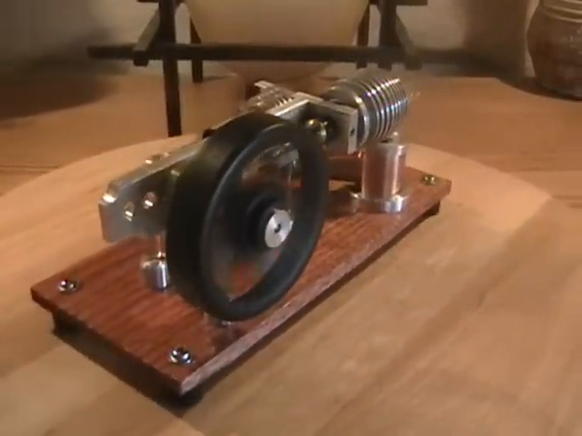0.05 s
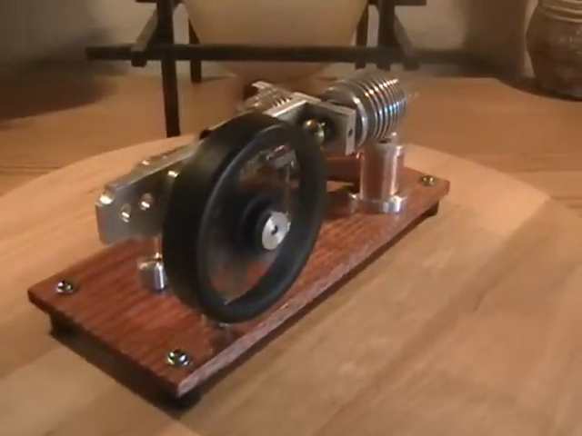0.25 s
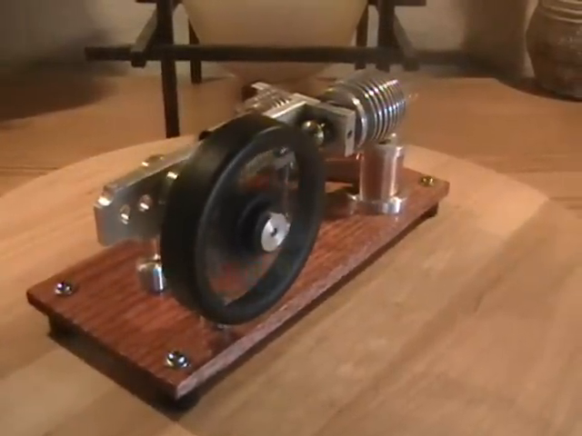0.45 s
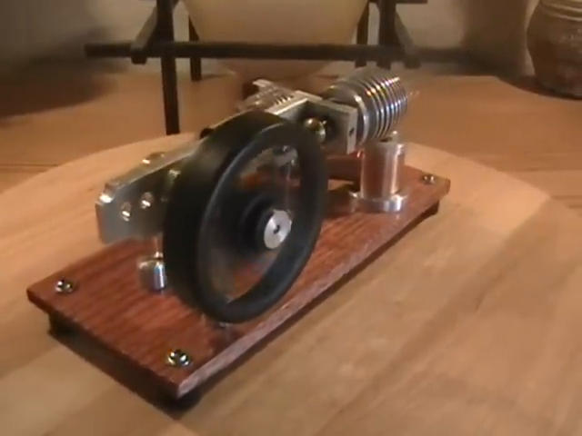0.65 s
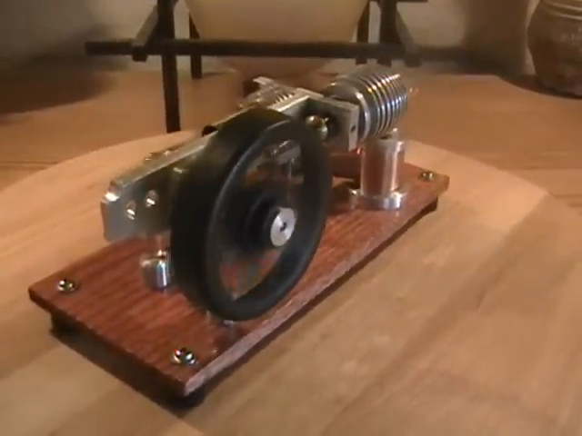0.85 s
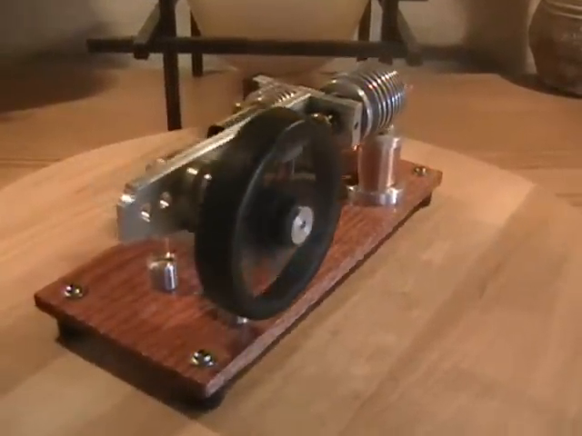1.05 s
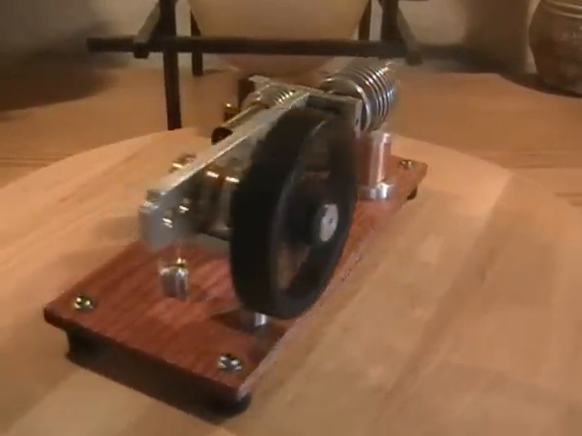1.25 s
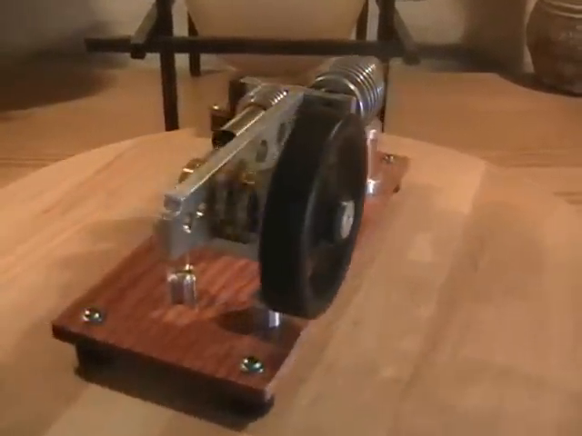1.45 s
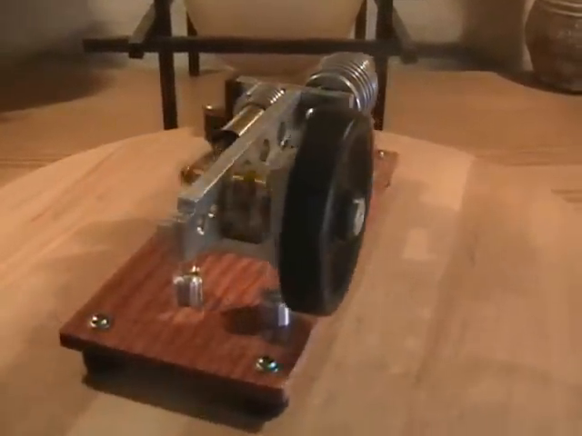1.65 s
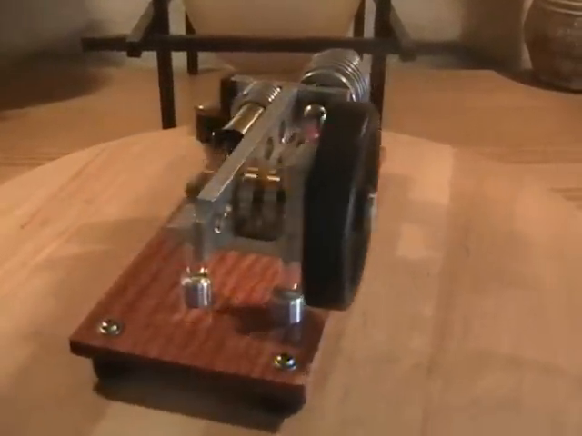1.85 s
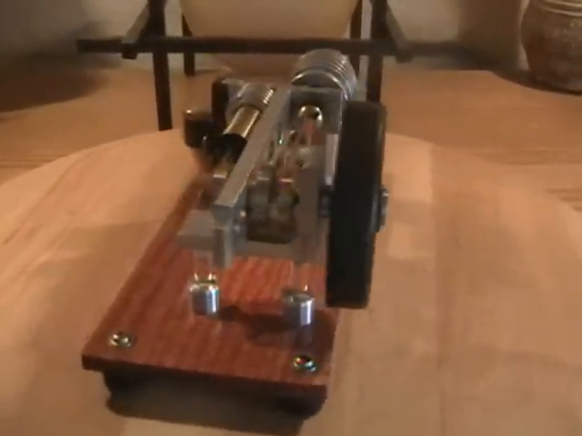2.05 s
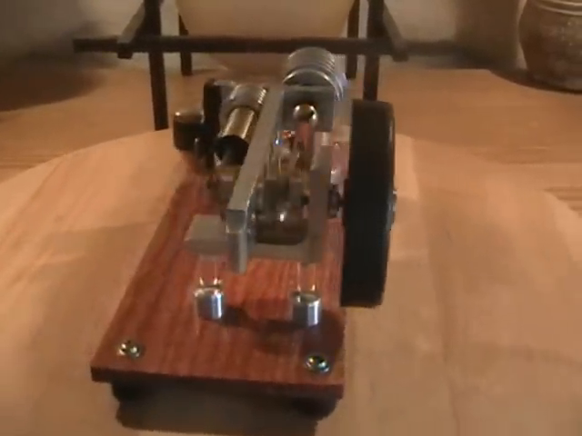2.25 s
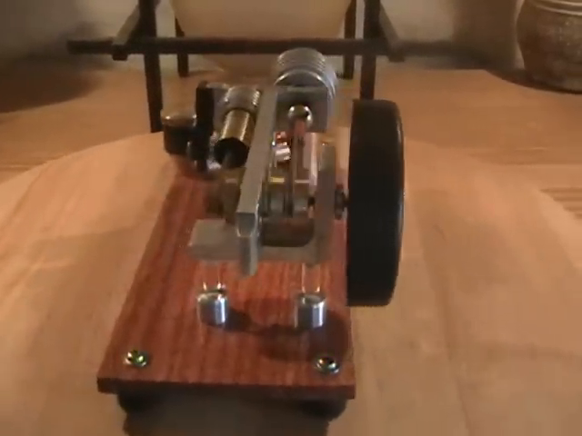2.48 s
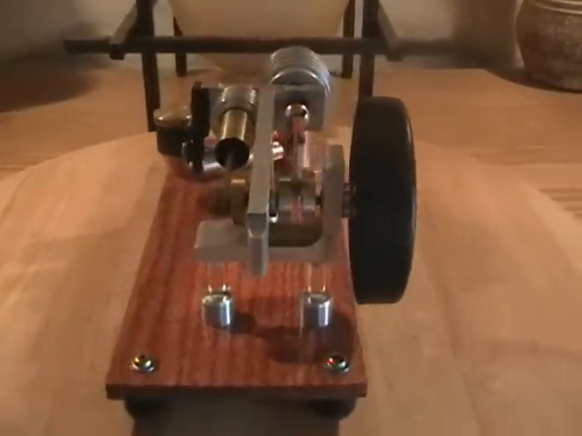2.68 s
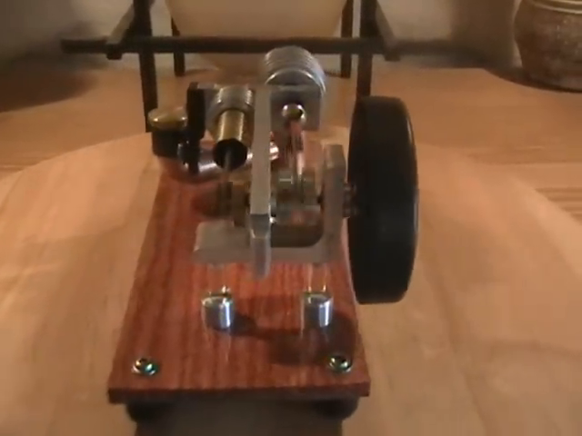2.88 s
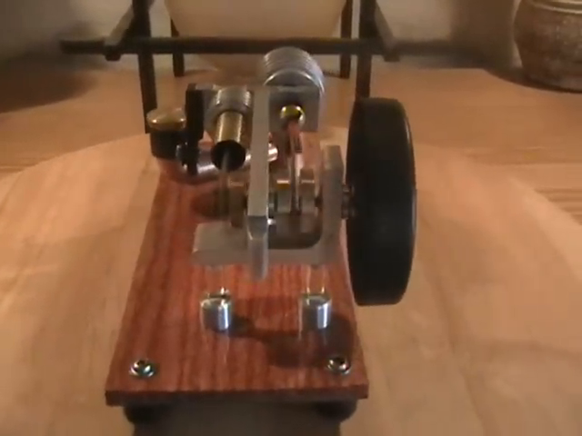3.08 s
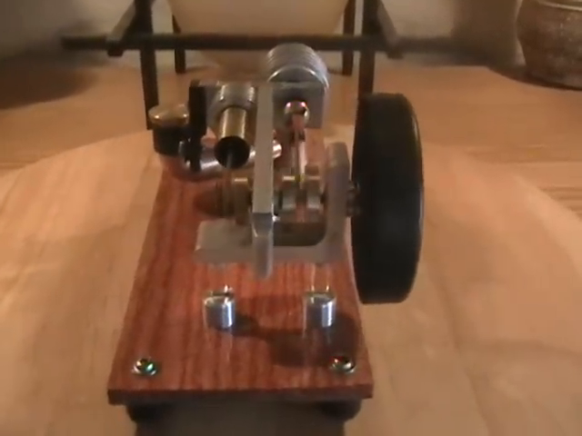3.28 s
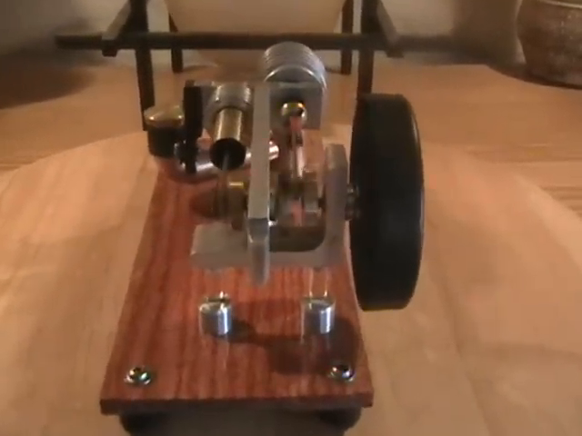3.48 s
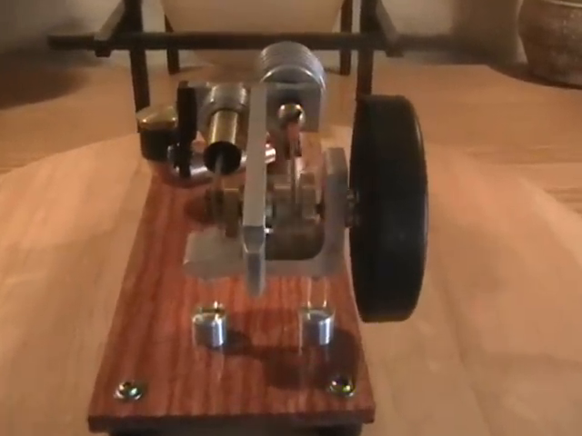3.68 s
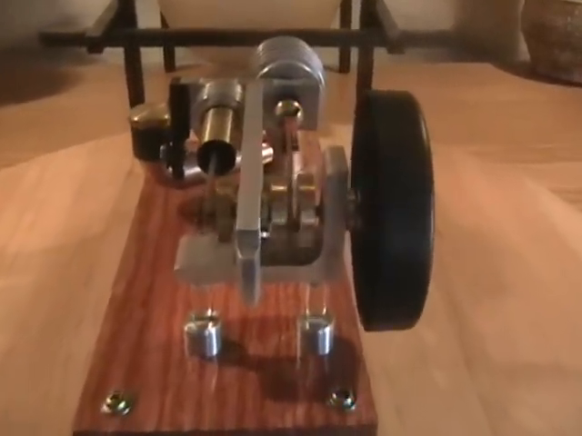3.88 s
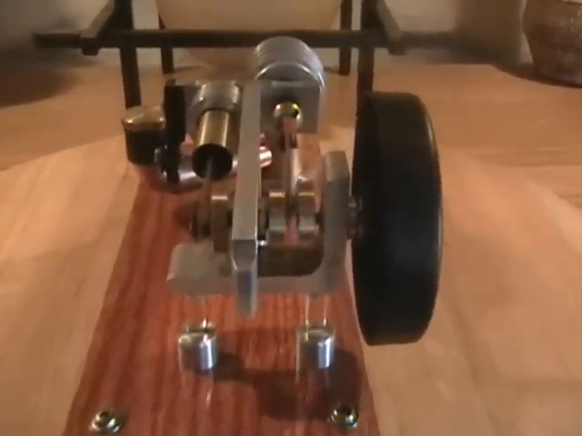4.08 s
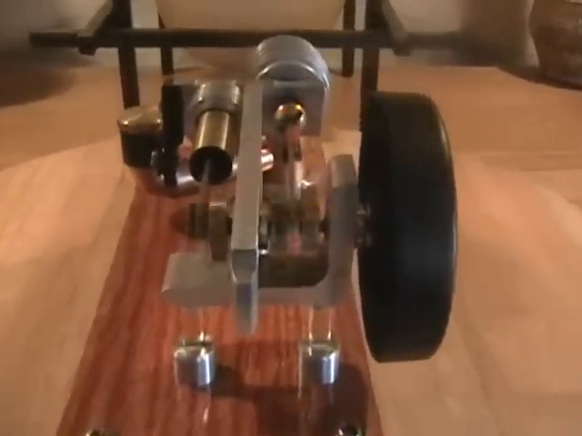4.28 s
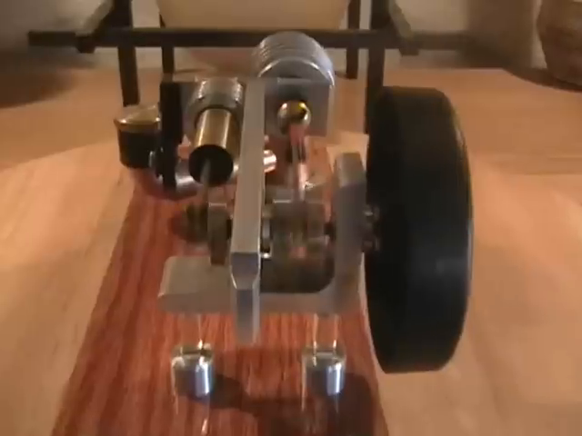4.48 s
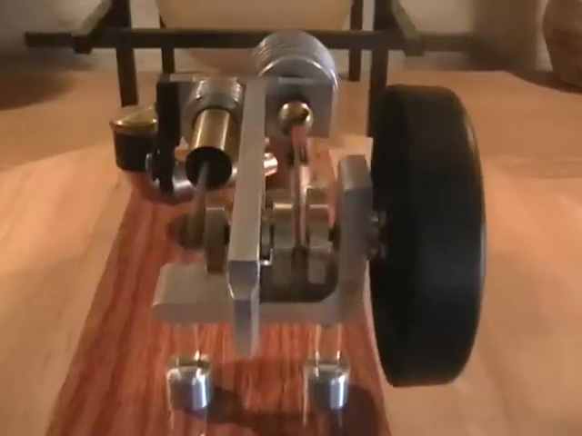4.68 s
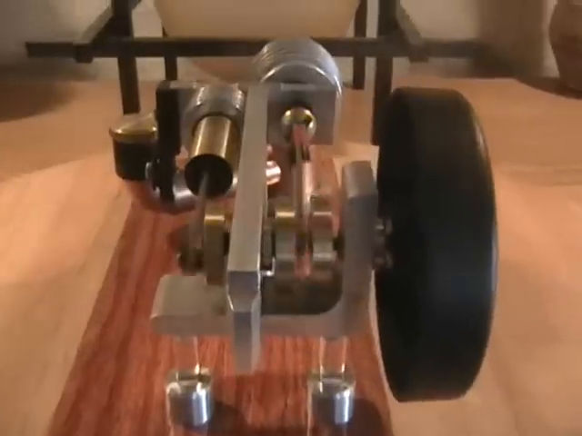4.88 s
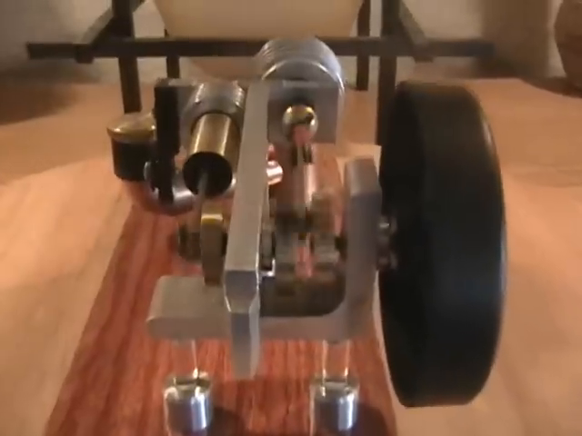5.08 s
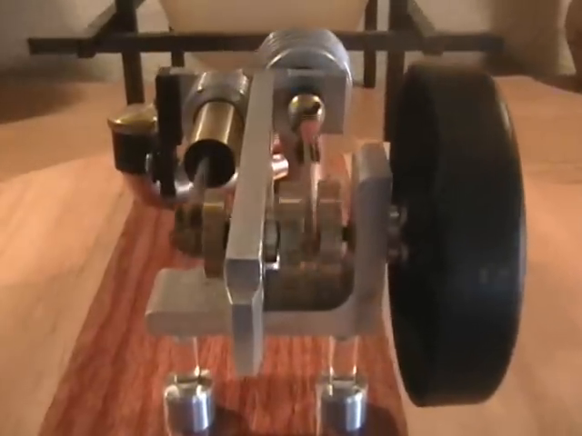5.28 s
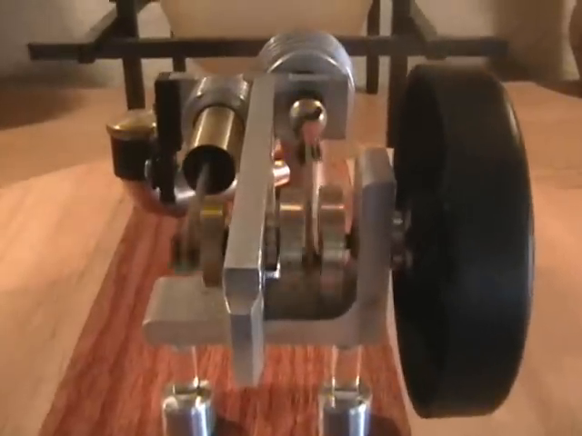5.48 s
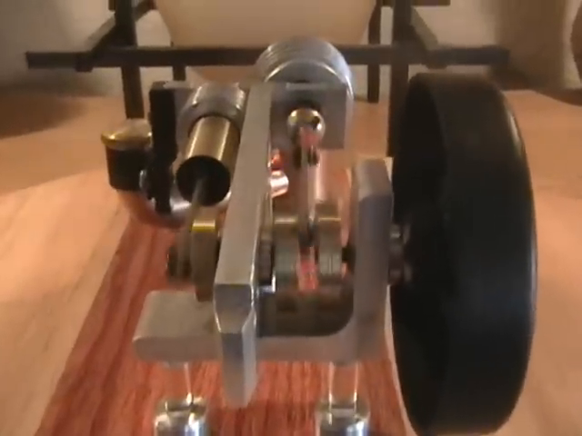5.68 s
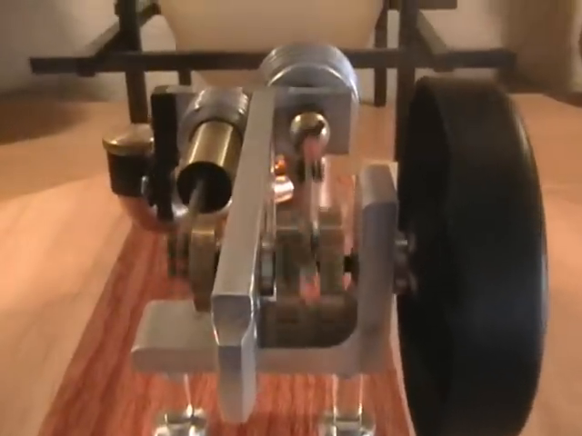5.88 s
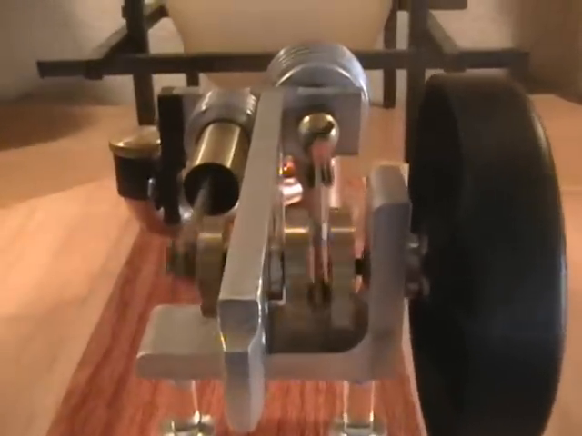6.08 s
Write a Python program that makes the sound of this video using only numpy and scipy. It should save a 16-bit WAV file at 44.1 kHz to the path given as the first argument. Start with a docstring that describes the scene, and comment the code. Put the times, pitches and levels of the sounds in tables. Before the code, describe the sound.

A little hot-air engine runs at steady speed on a wooden table, its loose linkage alternating metallic knocks and scratchier ticks, about six pairs a second. Light pin taps, piston rub and soft wooden drumming fill the gaps. After two seconds a dull bump comes and the knocks briefly falter. The microphone moves round to the front and closer, so the clatter grows louder; a dry snap and fainter bump come near the end. Quiet room, faint hum.

```python
"""A small hot-air engine on a wooden table turns a little over six times a second, first heard from the side.
Twice a turn linkage slack closes: a knock, then a scratchier tick, noise bursts that ring the frame's modes.
Pins tap softly, filtered noise makes piston rub and bearing purr, and low modes drum the base on the table.
After two seconds comes a dull bump and the knocks falter; the microphones move round, head-on and closer.
Near the end come a dry snap and another bump; soft room noise and a faint sine hum run throughout."""
import sys
import numpy as np
from scipy import signal
from scipy.fft import rfft, irfft, next_fast_len
from scipy.io import wavfile
from scipy.ndimage import map_coordinates

SR = 44100
rng = np.random.default_rng(int(sys.argv[2]) if len(sys.argv) > 2 else 0)


def unload_wav(signal):
    """Save mono or channel-first audio to the path in sys.argv[1] as 16-bit WAV at rate SR, clipped to [-1, 1]."""
    wavfile.write(
        sys.argv[1],
        SR,
        np.round(np.clip(np.atleast_2d(signal).T, -1, 1) * 32767).astype(np.int16),
    )


N = 270774

# Metal frame. Each row: mode in Hz, t60 in seconds, relative level in dB under a knock, the same under a tick,
# and change in dB from side-on to head-on.
FRAME_MODES = [(453, 0.13, -34, -40.5, 13.5), (836, 0.25, -23.5, -19, -17), (933, 0.24, -21.5, -26, 0),
               (983, 0.19, -20, -18, -1.5), (1098, 0.08, -13.5, -13, -3), (1317, 0.042, -13.5, -4, -2),
               (1445, 0.065, -20, -4, -7), (1625, 0.069, -7.5, -11, 6.5), (1720, 0.049, -11, -5.5, 11.5),
               (1815, 0.11, -7.5, -13, 0), (1954, 0.05, -6.5, -8, 13), (2051, 0.13, 7.5, 1.5, -10.5),
               (2154, 0.053, 5.5, -0.5, 1.5), (2267, 0.072, -3, 2.5, 2), (2318, 0.034, -6.5, -2, 8),
               (2542, 0.27, -19.5, -44, 2), (2553, 0.036, -5, -7, 5.5), (2737, 0.054, -27, -12.5, 9),
               (3231, 0.067, -11, -11.5, -1.5), (3336, 0.072, -23.5, -36, 9.5),
               (3560, 0.07, -12, -11.5, -9), (3783, 0.076, -15, -16.5, 3.5), (3972, 0.02, 5.5, -25, -3),
               (4114, 0.045, -4.5, -9, -4), (4614, 0.039, -4, 3, -22), (5060, 0.016, 4, 11.5, -51),
               (5300, 0.085, -20, -9, -23), (5683, 0.024, -9.5, -5, -4)]
# Crowded short-lived modes of rods and pins. Each row: frequency in Hz, relative density in dB per Hz.
KNOCK_COLOUR = [(60, -55), (200, -14), (450, -6), (750, -4.5), (1400, -4), (2100, 8), (2900, 2), (4000, 1),
                (5600, -6), (7200, -16.5), (8700, -12.5), (11500, -14.5), (14500, -24), (16500, -41)]
TICK_COLOUR = [(60, -55), (200, -32), (450, -8), (750, -5.5), (1400, -6), (2100, 6), (3200, -2), (4200, -2),
               (5500, 2), (7200, -10.5), (9000, -11.5), (12500, -8.5), (14500, -10.5), (16500, -51)]
# Force of the rod's knock, which falters and recovers. Each row: time in seconds, relative level in dB.
KNOCK_FORCE_CURVE = [(0, -1), (0.47, -1.5), (1.15, 0.5), (1.55, 0.8), (2.04, 1.8), (2.35, 2), (2.52, -5),
                     (2.68, -4.5), (2.97, 3.5), (3.29, -2), (3.46, 1.5), (3.61, 1), (3.779, -1), (4.15, -1),
                     (4.55, 1.5), (5.3, -1.5), (6.14, 2.5)]
# Force of the return stroke's rattle. Each row: time in seconds, relative level in dB.
TICK_FORCE_CURVE = [(0, -1.5), (0.6, -1.6), (1.2, -2.5), (2.1, 0), (3.2, -1), (3.5, 2.5), (3.7, 0.5),
                    (4.45, 3), (4.79, -3.5), (4.95, 1.5), (5.4, 0.5), (5.57, 4), (5.8, -3), (6.14, 6)]
# Treble of the contacts as the microphones move. Each row: time in seconds, relative level in dB.
TREBLE_CURVE = [(0, 0.3), (1.3, 1.2), (2.0, -0.2), (2.55, -1.25), (3.8, -0.7), (4.4, 1), (5.3, 3),
                (6.14, 2.5)]
# Flywheel. Each row: time in seconds, speed in turns a second.
FLYWHEEL_SPEED = [(0, 6.357), (1.9, 6.372), (2.55, 6.381), (3.3, 6.365), (6.14, 6.409)]
# Soft taps in every turn. Each row: delay in seconds after the crank's knock angle, relative level in dB,
# centre of the excited modes in Hz.
PIN_TAPS = [(.053, -7.5, 2100), (0.069, -10, 1810), (0.112, -9, 2080), (.126, -3.5, 1580),
            (.148, -9.5, 1600)]
# Piston friction. Each row: time in seconds, level in dB before trim and approach gain.
RUB_LEVEL = [(0, -53), (2.65, -49), (3.2, -51.5), (4, -52.5), (4.55, -51), (5.1, -53), (6.14, -50.5)]
# Spectrum of the piston friction. Each row: frequency in Hz, relative density in dB per Hz.
RUB_SPECTRUM = [(500, -10.5), (1000, 2.5), (1220, -37), (1500, 3.5), (1700, 14.5), (1820, -34), (2200, -14),
                (2450, 4), (3000, -10.5), (3900, -3.5), (6000, -38), (9000, -45), (15000, -49)]
# Wooden base on the table. Each row: mode in Hz, t60 in seconds, relative level in dB.
BASE_MODES = [(106.2, 0.34, -11), (114, 0.48, 1), (126, 0.16, -3), (229, 0.16, 0.5), (254, 0.62, -5.5),
              (374, 0.11, 2.5), (422, 0.043, 3.5)]
# Spectrum of the bearings. Each row: frequency in Hz, relative density in dB per Hz.
PURR_SPECTRUM = [(40, -32), (75, 0), (180, -12), (270, -6), (320, -17), (440, -0.5), (560, -13.5),
                 (900, -18), (2000, -46)]
# Dry snap. Each row: start in seconds, relative level in dB.
SNAP_TIMES = [(5.079, -27.5)]
# Dull bumps. Each row: start in seconds, relative level in dB.
BUMP_TIMES = [(2.344, -41), (5.647, -46)]
# Spectra of the snap and of a bump's two parts. Each row: frequency in Hz, relative density in dB per Hz.
SNAP_SPECTRUM = [(2000, -20), (5500, -6.5), (10000, 5), (15000, -4)]
THUMP_SPECTRUM = [(30, -14), (70, -1), (135, 14.5), (200, -9), (400, 5.5), (900, -46)]
CLACK_SPECTRUM = [(80, -14), (300, -1), (700, 9), (1350, 9), (2000, -10), (5000, -35)]
# Spectrum of the room noise. Each row: frequency in Hz, relative density in dB per Hz.
AIR_SPECTRUM = [(25, -50), (48, -34), (62, -14), (100, -1), (135, 2), (165, -9), (192, -10), (250, 2.5),
                (310, -5.5), (400, -4), (600, -7.5), (1200, -11), (4000, -22.5), (15000, -38)]
# Steady hum: an appliance tone near 240 Hz and two fainter steady tones. Each row: frequency in Hz, rms level
# in dB before the stereo balance.
HUM_TONES = [(239.5, -51.5), (291, -64.5), (178, -69)]
# Viewpoint of the microphones. Each row: time in seconds, position from 0 side-on to 1 head-on and close.
VIEWPOINT = [(0, 0.034), (3.4, 0.38), (4.5, 1), (6.14, 1)]
# Approach of the microphones. Each row: time in seconds, gain in dB.
APPROACH_GAIN = [(0, 1), (3.3, 1), (4.3, 1.5), (5.4, 6), (6.14, 4)]
# Echo of the room. Each row: frequency in Hz, t60 in seconds.
ROOM_DECAY = [(200, 0.1), (2000, 0.28), (5000, 0.21), (12000, 0.16)]
# Likeness of the two channels of noise. Each row: frequency in Hz, left-right correlation.
STEREO_LIKENESS = [(25, .65), (70, 0.96), (150, 0.91), (300, 0.75), (600, 0.57), (2000, 0.89),
                   (12000, 0.81)]
# Stereo balance. Each row: frequency in Hz, left minus right in dB.
STEREO_BALANCE = [(100, 3), (250, 2.5), (600, 1), (1400, -2.5), (2500, -2.1), (5000, -1.1), (12000, 0)]

TOP_HZ = 16400  # band limit of the microphones
LEAD = 512  # samples kept ahead of a contact
AGE = (np.arange(8192) - LEAD) / SR  # seconds since the contact
AFTER = np.maximum(AGE, 0)
TIME = np.arange(N) / SR
FIRST_KNOCK_S = 0.0019
TICK_ANGLE = 0.479  # turns from the knock to the return stroke's rattle
KNOCK_JITTER_S, TICK_JITTER_S = 0.0001, 0.0004  # the loose return stroke lands less exactly
FORCE_SCATTER_DB = 0.83  # from stroke to stroke
TREBLE_FOLLOWS = 0.19  # dB of treble for each dB of force: a harder contact mostly feeds the ring
BASE_NEAR = 0.51  # share of the approach gain, in dB, that reaches the drumming of the table


def linkage():
    """Slack closes twice a turn, in a knock and a tick; the knock has the harder crack."""
    _, _, knock_db, tick_db, _ = np.transpose(FRAME_MODES)
    knock_rows = blows(0, KNOCK_JITTER_S, KNOCK_FORCE_CURVE)
    tick_rows = blows(TICK_ANGLE, TICK_JITTER_S, TICK_FORCE_CURVE)
    knocks = contacts(knock_rows, knock_db, KNOCK_COLOUR, crack=1.4, clash_db=-10.5, clash_t60=0.05,
                      scrape=0.3, scrape_s=0.002, rise_s=0.0028, hold_s=0.019, chatter_db=1.0,
                      ring_db=-30, treble_db=-33.0)
    ticks = contacts(tick_rows, tick_db, TICK_COLOUR, crack=0.5, clash_db=-5.0, clash_t60=0.047,
                     scrape=0.74, scrape_s=0.0021, rise_s=0.0015, hold_s=0.022, chatter_db=2.5,
                     ring_db=-32.5, treble_db=-36.5)
    return knocks + ticks


def contacts(rows, mode_db, colour, crack, clash_db, clash_t60, scrape, scrape_s, rise_s, hold_s,
             chatter_db, ring_db, treble_db):
    """A joint slides through its slack, cracks home, chatters and sets frame and rods ringing."""
    track = np.zeros((2, N))
    slide = scrape * (AGE < 0) * np.exp(-(AGE / scrape_s) ** 2)
    impact = crack * fade(0.004)
    for s, low_db, high_db in rows:
        # the contact catches and lets go, about 700 times a second
        chatter = uneven((AGE - AGE[0]) * 700, chatter_db)
        envelope = impact + (slide + fade(clash_t60)) * chatter
        clash = clash_of(colour, s) * envelope
        frame = frame_ring(s, mode_db, scatter_db=2.5, rise_s=rise_s, hold_s=hold_s)
        x = frame + amp(clash_db) * clash / strength(clash)
        # level the ring below 3 kHz and the treble above it separately
        low = filtered(x, lambda hz: 1 / (1 + (hz / 3000) ** 16))
        high = x - low
        blow = amp(ring_db + low_db) * low / strength(low)
        blow = blow + amp(treble_db + high_db) * high / strength(high)
        add(track, s, in_room(blow, wet_db=-13))
    return track


def frame_ring(s, mode_db, scatter_db, rise_s, hold_s, detune=0.003):
    """Frame modes vary a little at every contact and change colour with the point of view."""
    hz, t60, _, _, head_on_db = np.transpose(FRAME_MODES)
    level, shift = rng.standard_normal((2, len(hz)))
    db = mode_db + head_on_db * at(VIEWPOINT, s) + scatter_db * level
    x = ring(hz * (1 + detune * shift), t60, db, rng.uniform(0, 2 * np.pi, len(hz)))
    # the ring spreads through the frame, then is choked as the joint takes the load
    spread = 1 - np.exp(-AFTER / rise_s)
    x = x * spread / np.sqrt(1 + (AFTER / hold_s) ** 6)
    return x / strength(x)


def clash_of(colour, s, ripple_db=3, ripple_hz=420, glint_hz=8600, glint_db=5.0):
    """Each contact favours other short-lived modes; towards head-on, the open cylinder adds a bright glint."""
    def response(hz):
        glint = amp(glint_db * at(VIEWPOINT, s) * np.exp(-((hz - glint_hz) / 800) ** 2))
        return uneven(hz / ripple_hz, ripple_db) * glint
    return filtered(noise(colour, len(AGE)), response)


def blows(angle, jitter_s, force):
    """One contact a turn: rows of time in seconds, gain of the ring in dB, gain of the treble in dB."""
    s = strokes(angle)
    late, harder, brighter = rng.standard_normal((len(s), 3)).T
    force_db = at(force, s) + FORCE_SCATTER_DB * harder
    treble_db = TREBLE_FOLLOWS * force_db + FORCE_SCATTER_DB * brighter
    return np.transpose([s + jitter_s * late, at(APPROACH_GAIN, s) + force_db, at(TREBLE_CURVE, s) + treble_db])


def turns():
    """Turns of the flywheel since the first knock angle, at every sample."""
    return np.cumsum(at(FLYWHEEL_SPEED, TIME)) / SR - FIRST_KNOCK_S * at(FLYWHEEL_SPEED, 0)


def strokes(angle):
    """The times at which the crank passes an angle, given in turns."""
    crank = turns()
    return np.interp(np.arange(angle, crank[-1]), crank, TIME)


def pins(side_db=-44, head_on_db=-38, octaves=0.68):
    """Lightly loaded pins tap near fixed crank angles; each soft contact favours a narrow band of frame modes."""
    track = np.zeros((2, N))
    hz, _, _, tick_db, _ = np.transpose(FRAME_MODES)
    for s in strokes(0):
        level_db = side_db + (head_on_db - side_db) * at(VIEWPOINT, s)
        for delay, db, centre_hz in PIN_TAPS:
            mode_db = tick_db / 2 - 6 * (np.log2(hz / centre_hz) / octaves) ** 2
            tap = frame_ring(s, mode_db, scatter_db=6.5, rise_s=0.00055, hold_s=0.016)
            tap_s = s + delay + rng.normal(0, 0.001227)
            add(track, tap_s, amp(level_db + db + rng.normal(0, 2.4)) * tap)
    return track


def piston(level_db=-3, swing_db=2, stick_db=4.0, stick_rate=130):
    """Sliding friction catches unevenly and swells twice a turn with the piston's speed."""
    speed = np.cos(4 * np.pi * (turns() - 0.37))
    knots = rng.standard_normal(int(N * stick_rate / SR) + 4)
    stick = map_coordinates(knots, [TIME * stick_rate])
    rub = unit(amp(stick_db * stick) * noise(RUB_SPECTRUM, N))
    return amp(at(RUB_LEVEL, TIME) + at(APPROACH_GAIN, TIME) + level_db + swing_db * speed) * rub


def base(level_db=-51.5, rise_s=0.0049):
    """Every stroke pushes the wooden base softly against the table, with a slightly varied mix of modes."""
    track = np.zeros((2, N))
    hz, t60, db = np.transpose(BASE_MODES)
    for angle, push_db in ((0, 0), (TICK_ANGLE, -3)):
        for s in strokes(angle):
            thud = ring(hz, t60, db + 2 * rng.standard_normal(len(hz)), np.zeros(len(hz)))
            thud = thud * (1 - np.exp(-(AFTER / rise_s) ** 2))
            gain_db = level_db + push_db + BASE_NEAR * at(APPROACH_GAIN, s)
            add(track, s, amp(gain_db) * thud / strength(thud))
    return track


def bearings(side_db=-66, head_on_db=-56):
    """The shaft's bearings roll with a low noise purr that grows as the microphones come round and close."""
    level_db = side_db + (head_on_db - side_db) * at(VIEWPOINT, TIME)
    return amp(level_db) * noise(PURR_SPECTRUM, N)


def strays():
    """Fading noise bursts make a dry snap and dull bumps beside the engine's beat."""
    track = np.zeros((2, N))
    for s, db in SNAP_TIMES:
        snap = noise(SNAP_SPECTRUM, len(AGE)) * fade(0.0064)
        add(track, s, in_room(amp(db) * snap, wet_db=-8))
    for s, db in BUMP_TIMES:
        thump = noise(THUMP_SPECTRUM, len(AGE)) * fade(0.56)
        clack = noise(CLACK_SPECTRUM, len(AGE)) * fade(0.067)
        onset = 1 - np.exp(-AFTER / 0.0017)
        add(track, s, amp(db) * (thump + 2.6 * clack) * onset)
    return track


def room_tone(air_db=-49.0):
    """Soft ventilation noise, the steady sine hum of an appliance and two fainter steady tones."""
    hum = np.zeros(N)
    for hz, db in HUM_TONES:
        hum += amp(db) * np.sqrt(2) * np.sin(2 * np.pi * (hz * TIME + rng.random()))
    return amp(air_db) * noise(AIR_SPECTRUM, N) + hum


def in_room(x, wet_db):
    """A blow and the room's diffuse answer, whose decay time depends on frequency."""
    hz, t, z = signal.stft(rng.standard_normal((2, len(AGE))), SR, nperseg=256)
    decay = np.exp(-np.log(1000) * t / along(ROOM_DECAY, hz)[:, None])
    tail = signal.istft(z * decay, SR, nperseg=256)[1]
    tail = tail + 0.24 * tail[::-1]  # close microphones share much of the echo
    wet = signal.fftconvolve(x, amp(wet_db) * tail / np.sqrt(np.sum(tail[0] ** 2)), axes=1)
    wet[:, :x.shape[-1]] += x
    return wet


def noise(colour, size):
    """Stereo noise of rms 1, partly alike in both channels."""
    def mid_and_side(hz):
        turn = np.arccos(np.clip(along(STEREO_LIKENESS, hz), -1, 1)) / 2
        return amp(along(colour, hz)) * [np.cos(turn), np.sin(turn)]
    mid, side = filtered(rng.standard_normal((2, size)), mid_and_side)
    return unit(np.array([mid + side, mid - side]))


def ring(hz, t60, db, phase):
    """A sum of exponentially dying modes."""
    t = np.float32(AFTER)
    speed, decay, start = np.float32([2 * np.pi * hz, np.log(1000) / t60, phase])[:, :, None]
    gain = np.float32(amp(db))[:, None]
    modes = gain * np.sin(speed * t + start) * np.exp(-decay * t)
    return (AGE >= 0) * modes.sum(0)


def fade(t60):
    """Envelope of a blow that dies by 60 dB in t60 seconds."""
    return (AGE >= 0) * np.exp(-np.log(1000) * AFTER / t60)


def uneven(position, depth_db):
    """A smooth random gain with a new value at each unit of position."""
    knots = rng.standard_normal(int(position[-1]) + 4)
    return amp(depth_db * map_coordinates(knots, [position]))


def add(track, s, sound):
    """Mix a blow into the track with its contact at s seconds."""
    start = round(s * SR) - LEAD
    a, b = max(start, 0), min(start + sound.shape[-1], N)
    if b > a:
        track[:, a:b] += sound[..., a - start:b - start]


def filtered(x, response):
    """Shape the spectrum of x by a response of frequency in Hz."""
    size = x.shape[-1]
    m = next_fast_len(size + 2048)
    return irfft(rfft(x, m) * response(np.fft.rfftfreq(m, 1 / SR)), m)[..., :size]


def along(points, hz):
    """Read a curve of frequency in Hz on a log axis."""
    f, v = np.transpose(points)
    return np.interp(np.log(hz + 1), np.log(f + 1), v)


def at(rows, s):
    """Read a curve of time at s seconds."""
    return np.interp(s, *np.transpose(rows))


def strength(x):
    """Rms of a blow over its first 20 ms."""
    return np.sqrt(np.mean(x[..., LEAD:LEAD + SR // 50] ** 2) + 1e-20)


def unit(x):
    """Scale to rms 1."""
    return x / np.sqrt(np.mean(x ** 2) + 1e-20)


def amp(db):
    """Decibels to gain."""
    return 10 ** (np.asarray(db) / 20)


def scene():
    """Engine, strays and room together, with the bass leaning left and the upper mids right."""
    x = linkage() + pins() + base() + piston() + bearings() + strays() + room_tone()
    return filtered(x, lambda hz: amp(np.outer([0.5, -0.5], along(STEREO_BALANCE, hz))))


def record(dry, low_cut_hz=38):
    """The microphones roll off the deepest bass and keep nothing above their band limit."""
    def response(hz):
        low_cut = hz ** 2 / np.hypot(hz ** 2, low_cut_hz ** 2)
        return low_cut * (hz < TOP_HZ)
    return filtered(dry, response)


dry = scene()
out = record(dry)
unload_wav(out)
```